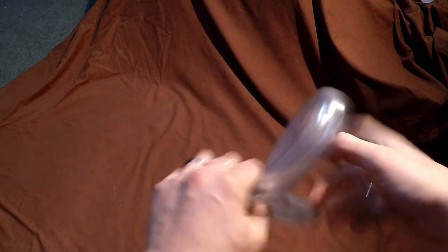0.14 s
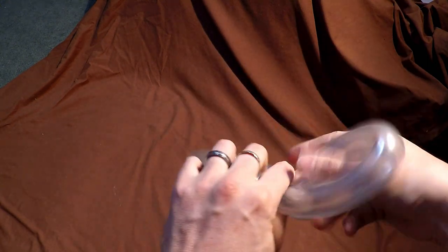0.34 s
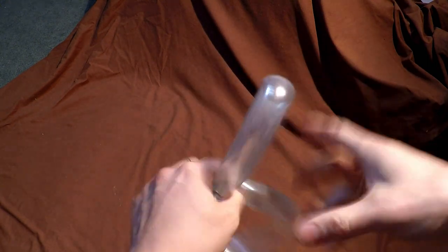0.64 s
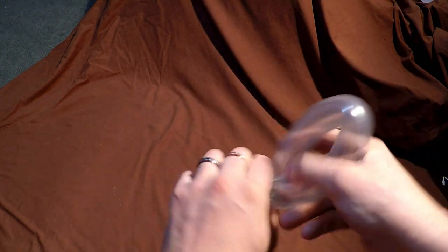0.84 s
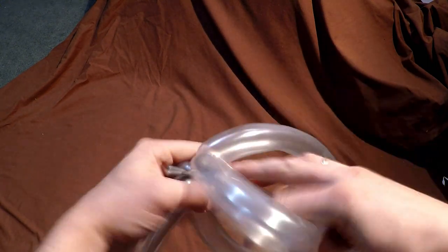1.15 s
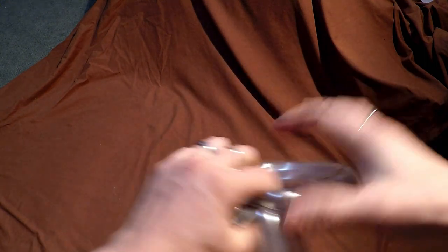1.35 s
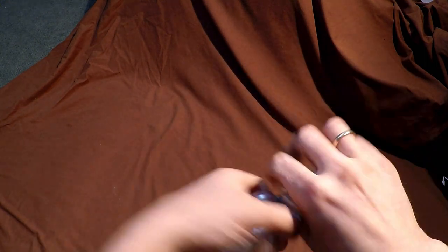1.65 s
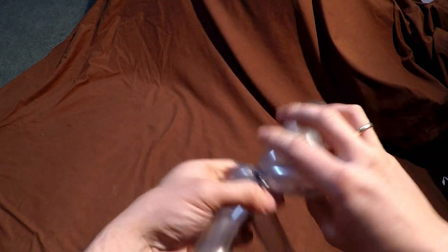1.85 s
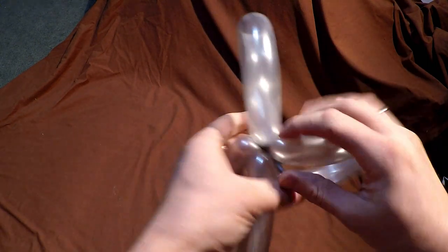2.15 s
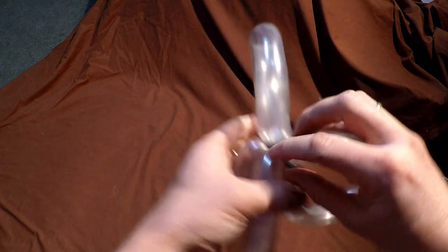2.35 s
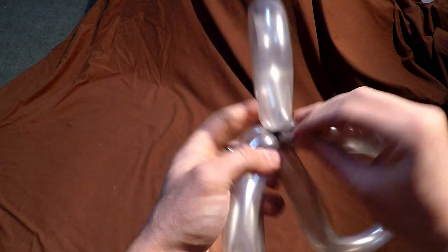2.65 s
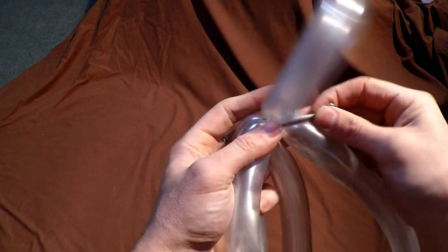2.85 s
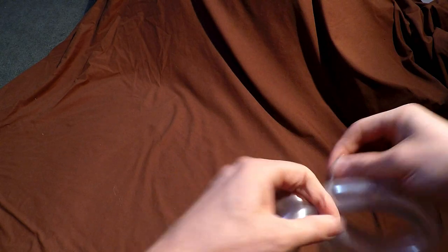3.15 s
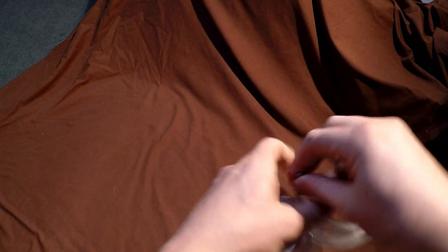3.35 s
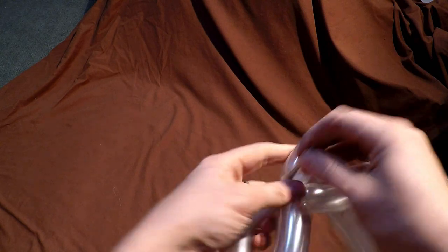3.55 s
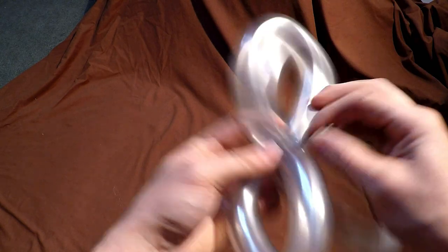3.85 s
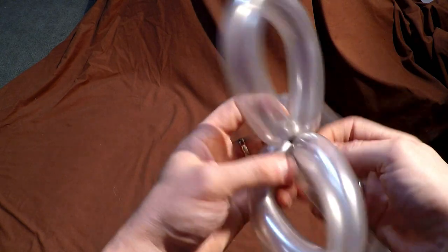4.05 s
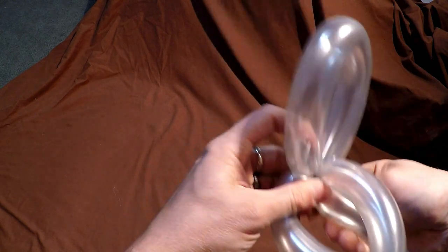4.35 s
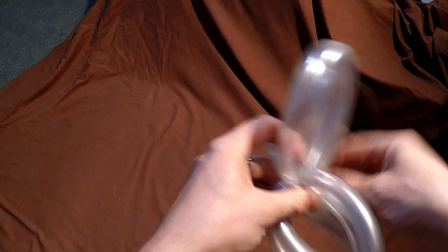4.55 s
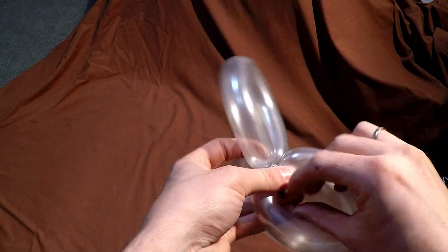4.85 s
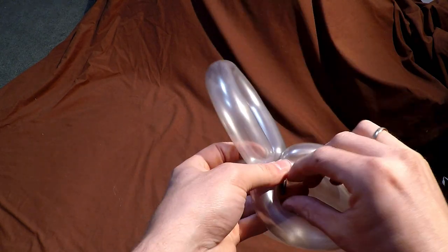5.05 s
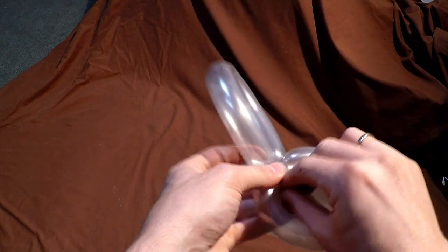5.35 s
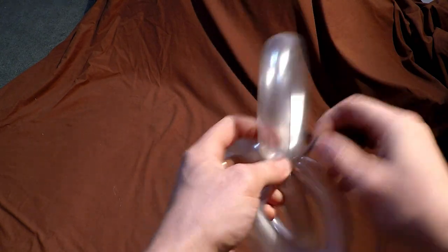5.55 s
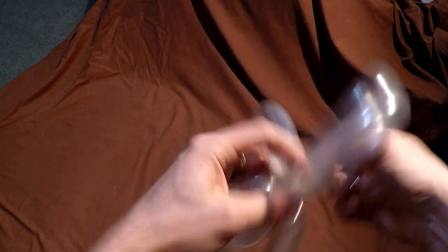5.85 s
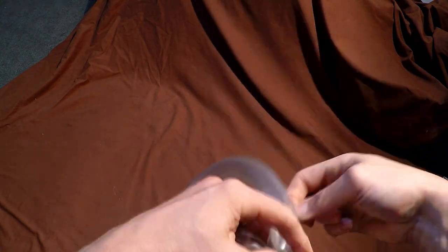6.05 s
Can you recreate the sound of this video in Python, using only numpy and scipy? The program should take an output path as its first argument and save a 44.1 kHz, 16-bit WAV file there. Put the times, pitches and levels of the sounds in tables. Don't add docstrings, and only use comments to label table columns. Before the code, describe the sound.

A long balloon is folded and tightened at close range. Dry skin scuffs over the rubber in uneven strokes, hollow thumps sound as fingers press it, and fine clicks are scattered throughout. Around halfway the rubber sticks and slips in hard cracks and creaks; later a knot ticks rapidly and squeals harshly, followed by short chirps and rubbing. Faint hiss, low air bumps, almost no echo.

```python
import sys
import numpy as np
from scipy import signal
from scipy.fft import rfft, irfft, next_fast_len
from scipy.io import wavfile
from scipy.ndimage import uniform_filter1d, map_coordinates

SR = 44100
rng = np.random.default_rng(int(sys.argv[2]) if len(sys.argv) > 2 else 0)


def master_out(mix):
    frames = np.transpose(np.atleast_2d(mix))
    ceiling = np.clip(frames, -1, 1)
    pcm = np.round(ceiling * 32767).astype(np.int16)
    wavfile.write(sys.argv[1], SR, pcm)


def boost(x):
    u = np.asarray(x, float) / 20
    return 10 ** u


N = 273665
TIME_S = np.arange(N) / SR


def unit(x):
    return x / np.sqrt(np.mean(x ** 2) + 1e-20)


def along(points, hz):
    point_hz, value = np.transpose(points)
    return np.interp(np.log(hz + 1), np.log(point_hz + 1), value)


def over_time(points):
    return np.interp(TIME_S, *np.transpose(points))


def wobble(knots_per_s):
    knots = rng.standard_normal(int(N * knots_per_s / SR) + 4)
    return map_coordinates(knots, [np.arange(N) * knots_per_s / SR])


def coloured(x, spectrum):
    m = next_fast_len(N + 8192) * 2
    points = [(1, -120)] + list(spectrum) + [(SR / 2, -120)]
    gain = boost(along(points, np.fft.rfftfreq(m, 1 / SR)))
    cepstrum = irfft(np.log(gain), m)
    cepstrum[1:m // 2] *= 2
    cepstrum[m // 2 + 1:] = 0
    return unit(irfft(rfft(x, m) * np.exp(rfft(cepstrum)), m)[:N])


def placed(times_s, shapes):
    at = np.round(times_s * SR).astype(int)[:, None] + np.arange(shapes.shape[1])
    return np.bincount(at.ravel(), shapes.ravel(), N + SR)[:N]


def row_peak(x):
    return np.abs(x).max(axis=1, keepdims=True)


def row_norm(x):
    return np.linalg.norm(x, axis=1, keepdims=True)


def onset(t, rise_s):
    return 1 - np.exp(-t / rise_s)


def patchy(depth_db):
    z = signal.stft(rng.standard_normal(N + 512), nperseg=256)[2]
    field = uniform_filter1d(rng.standard_normal(z.shape), 5, 0)
    field = uniform_filter1d(field, 9, 1)
    return unit(signal.istft(z * boost(depth_db * unit(field)), nperseg=256)[1][:N])


def micro_slips(per_second, spread_db, clump_db):
    chance = rng.random((3, N))
    hit = chance[0] < per_second / SR * boost(clump_db * wobble(35))
    size = boost(-spread_db * np.log(chance[2] + 1 / 20))
    return unit(hit * np.sign(chance[1] - .5) * size)


# start_s, end_s, drag_db, fine_surface_db (re
STROKES = [(0, 0.077, -37, -13), (0.146, 0.22, -33, -10), (0.269, 0.42, -36.5, -9.5),
           (0.453, 0.57, -40.5, -12), (0.518, 0.57, -34, -6), (0.672, 0.72, -43.5, -18),
           (0.769, 1.12, -41.5, -9), (0.881, 0.99, -39, -9), (0.934, 1.075, -31, -10),
           (1.119, 1.188, -37.5, -4.5), (1.208, 1.31, -38.5, -18), (1.955, 1.8, -32, -16),
           (1.438, 1.48, -34, -12), (1.488, 1.585, -37, -11.5), (1.56, 1.742, -32, -13),
           (1.785, 1.833, -29, -15.5), (1.88, 2.42, -39, -10.5), (2.085, 2.18, -37.5, -12),
           (2.351, 2.43, -38.5, -14), (2.913, 2.95, -34, -11), (2.432, 2.567, -37, -11),
           (2.613, 2.63, -39, -18), (2.642, 2.69, -30.5, -10.5), (2.745, 3.11, -37, -9.5),
           (3.043, 3.03, -23.5, -8), (3.095, 3.13, -33, -14), (3.182, 3.225, -28, -9.5),
           (3.153, 3.16, -31.5, -13), (3.266, 3.354, -37, -9), (3.398, 3.5, -31.5, -12.5),
           (3.512, 3.96, -33.5, -11), (3.572, 3.618, -26.5, -24),
           (3.736, 3.806, -39, -10), (3.863, 3.894, -26.5, -10), (3.936, 4.098, -25.5, -13),
                (4.157, 4.202, -31.5, -14), (4.213, 4.302, -36, -11), (4.287, 4.32, -35, -14),
                (4.332, 4.424, -27, -9.5), (4.478, 4.567, -34, -8.5), (4.613, 4.727, -37.5, -8.5),
                (4.756, 4.981, -32.5, -12), (5.014, 5.075, -33, -11), (5.129, 5.236, -30.5, -13),
                (5.258, 5.342, -25.5, -12.5), (5.41, 5.488, -37.5, -7), (5.511, 5.549, -28, -14.5),
                (5.594, 5.626, -34.5, -6.5), (5.684, 5.71, -24.5, -11.5), (5.765, 5.827, -40, -7),
                (5.843, 5.866, -28.5, -12.5), (5.92, 6.007, -31, -10.5), (6.005, 6.16, -40.5, -6.5),
                (6.163, 6.21, -27, -16)]
RISE_DB_PER_S, FALL_DB_PER_S = 800, 250
SAG_DB_PER_S = 12
HOLLOW_DB, HOLLOW_FOLLOWS = -18, 0.79


def drag():
    t = np.arange(0, N + 64, 64) / SR
    start, end, db, fine_db = np.transpose(STROKES)[:, :, None]
    stroke_db = db - RISE_DB_PER_S * np.clip(start - t, 0, None)
    stroke_db = stroke_db - FALL_DB_PER_S * np.clip(t - end, 0, None)
    stroke_db = stroke_db - SAG_DB_PER_S * (np.clip(t, start, end) - (start + end) / 2)

    def total(levels_db):
        return np.interp(TIME_S, t, 10 * np.log10((boost(levels_db) ** 2).sum(0)))

    rub_db = total(stroke_db)
    return rub_db, total(stroke_db + fine_db), HOLLOW_DB + HOLLOW_FOLLOWS * rub_db


# start_s, end_s, ring_hz, level_db
GRIPS = [
    (0.252, 0.45, 1530, 9),
    (0.904, 1.162, 1160, 4),
    (1.525, 2.287, 1530, 4.5),
    (3.09, 3.47, 3400, -6),
    (3.793, 4.743, 2360, -2),
    (4.738, 5.2, 844, 4),
    (5.44, 5.595, 750, -7),
    (5.65, 5.982, 1850, 5),
]


def free_wall(force, width_hz):
    out = np.zeros(N)
    for start, end, hz, db in GRIPS:
        held = np.clip(np.minimum(TIME_S - start, end - TIME_S) / 0.024, 0, 1)
        out += held * boost(db) * unit(signal.lfilter(*signal.iirpeak(hz, hz / width_hz, SR), force))
    return out


# freq_hz, density_db (per Hz)
RUB = [(350, -23), (700, -9), (1200, -2), (3600, -4.5), (6500, -15.5), (9500, -29)]
FIZZ = [(2500, -31), (5000, 4), (7500, -4), (11000, -8.5), (16500, -14)]
HOLLOW = [(90, -20), (200, -3), (620, 0.5), (1300, -10.5)]
# time_s, share
GRIT = [(0, .45), (.5, .62), (2.9, .62), (3.8, .5), (3.95, .3), (4.45, .35), (4.75, .55), (5.2, .55),
        (5.5, .25), (6.21, .5)]


def rubbing():
    rub_db, fizz_db, hollow_db = drag()
    grains = micro_slips(450, spread_db=4, clump_db=3) * over_time(GRIT)
    stutter_db = .3 * wobble(16) + 1.1 * wobble(70)
    force = coloured(1.1 * grains + patchy(3), RUB)
    wall = force + boost(-17.5) * free_wall(force, width_hz=260)
    rub = boost(rub_db - 4.0 + stutter_db) * wall
    fizz = boost(fizz_db - 0.65 + 1.6 * stutter_db) * coloured(2.23 * grains + patchy(1.0), FIZZ)
    hollow = boost(hollow_db + 1.2 * stutter_db) * coloured(.8 * grains + patchy(3), HOLLOW)
    return rub + fizz + hollow


# time_s, level_db
SWING = [(0.0, -47), (0.41, -64), (1.5, -55), (1.91, -60), (2.19, -53), (2.64, -50), (3.02, -54),
         (3.37, -51.5), (3.87, -49.5), (4.02, -49), (4.25, -46), (4.61, -50), (5.01, -61), (5.46, -49.5),
         (6.2, -60)]
# freq_hz, density_db (per Hz)
PUSH = [(14, -3), (40, -5), (140, -7), (300, -22.5)]


def pushed_air():
    level_db = over_time(SWING) + 1.5 + 4.5 * wobble(10.0)
    return boost(level_db) * coloured(rng.standard_normal(N), PUSH)


# freq_hz, density_db (per Hz)
HISS = [(20, 18), (16000, -44)]


def quiet_floor():
    return boost(-60.0) * coloured(rng.standard_normal(N), HISS)


# time_s, peak_db, chamber_hz, length_s
TAPS = [(0.146, -23, 380, 0.003), (0.187, -21, 404, 0.0057), (0.2, -30, 93, 0.008),
        (0.53, -17.5, 458, 0.00035), (0.536, -34, 102, 0.018), (0.627, -40, 65.6, 0.042),
        (0.756, -23.5, 413, 0.0031), (1.228, -26, 90.9, 0.011), (1.42, -29, 300, 0.011),
        (1.435, -28.5, 746, 0.0069), (1.458, -22.5, 140, 0.01), (0.205, -35, 337, 0.021),
        (0.779, -40, 345, 0.03), (3.043, -12.5, 170.1, 0.0023), (1.448, -32, 68, 0.031),
        (1.455, -16, 254, 0.0012), (1.625, -32, 84, 0.0058), (1.803, -27, 480, 0.016),
        (2.087, -43, 100, 0.067), (2.435, -46, 90, 0.0064), (2.436, -24, 302, 0.0024),
        (3.047, -14.5, 323, 0.0023), (3.048, -12.5, 100, 0.004), (3.182, -31.5, 375, 0.0073),
        (3.233, -36, 69.5, 0.02), (3.396, -19, 510, 0.0033), (3.61, -30.5, 480, 0.038),
        (3.66, -35, 60, 0.023), (3.893, -29.5, 77, 0.056), (4.393, -17.5, 482, 0.0015),
        (4.68, -28, 99, 0.0085), (5.864, -30.5, 81.4, 0.011), (5.997, -24, 277, 0.0041),
        (6.018, -23, 64.4, 0.006), (6.178, -30, 437, 0.0018)]
# time_s, peak_db, chamber_hz, length_s
MORE_TAPS = [
    (1.045, -36, 160, 0.024),
    (1.443, -32.5, 42.3, 0.065),
    (2.974, -36, 170, 0.038),
    (3.054, -30, 52, 0.018),
    (4.045, -31.5, 67, 0.078),
    (4.174, -37, 66.4, 0.045),
    (4.231, -39, 76.4, .04),
    (4.411, -37, 111, 0.044),
    (4.533, -33.5, 63, 0.026),
    (6.026, -27, 41, 0.03),
]


def taps():
    s, db, hz, length_s = np.transpose(TAPS + MORE_TAPS)[:, :, None]
    t = np.arange(-1500, 4500) / SR
    drift = np.cumsum(rng.standard_normal((len(s), len(t))), 1) * .045
    rise = np.exp(-(t / (.5 * length_s)) ** 2)
    fall = np.exp(-np.abs(t) / (0.19 * length_s))
    swell = np.where(t < 0, rise, fall)
    return placed(s[:, 0] + t[0], boost(db + 3.0) * swell * np.sin(2 * np.pi * hz * t + drift))


TUBE_HZ, TUBE_T60_S = 990, .014


def tube_knock(t, detune_db):
    return np.sin(2 * np.pi * TUBE_HZ * boost(detune_db) * t) * boost(-60 * t / TUBE_T60_S) * onset(t, .001)


# time_s, peak_db,
# ring_hz
CREEP_TICKS = [(4.7627, -23, 3530), (4.7705, -17, 2260), (4.778, -22, 2800), (4.7873, -23, 1920),
               (4.7912, -24, 3120), (4.7976, -23, 1830), (4.8015, -17, 2170), (4.8068, -19, 3850),
               (4.8129, -13, 3700), (4.8242, -10, 3200), (4.8332, -17, 2730), (4.8416, -20, 2650),
               (4.8506, -18, 2710), (4.8577, -21, 4500), (4.8644, -23, 4570), (4.8881, -22, 4800),
               (4.8997, -19, 4090), (4.9034, -21, 3830), (4.9082, -23, 3100), (4.9227, -20, 4590),
               (4.9308, -21, 3450), (4.9412, -19, 4610), (4.9461, -23, 3450), (4.9603, -15, 4570),
               (4.9649, -24, 3660), (4.9781, -15, 4200), (5.002, -16, 4110), (5.0091, -18, 4050),
               (5.0155, -20, 5280), (5.021, -19, 4670), (5.0261, -18, 4180), (5.0302, -17, 3980),
               (5.0346, -20, 3400), (5.0376, -18, 5170), (5.0434, -18, 4160), (5.0546, -16, 5300),
               (5.0615, -23, 2240), (5.0682, -20, 2280), (5.0711, -24, 3510), (5.0965, -25, 2500),
               (5.1068, -26, 4460), (5.1237, -25, 1810), (5.1504, -20, 4440), (5.1598, -14, 4240),
               (5.1983, -19, 3120), (5.2099, -21, 2560), (5.2164, -21, 2090), (5.244, -17, 4650)]
SCATTERED_TICKS = [(0.2586, -30, 950), (0.2726, -23, 1460), (0.2842, -29, 1400), (0.3012, -27, 1400),
                   (0.3115, -30, 1460), (0.32, -26, 1400), (0.3298, -26, 1400), (0.3573, -22, 1460),
                   (0.3681, -29, 1660), (0.3812, -24, 1360), (0.3946, -27, 1420), (0.4093, -27, 1380),
                   (0.4237, -27, 1340), (0.8941, -24, 4630), (0.9317, -20, 2840), (0.9395, -21, 1660),
                   (1.118, -25, 5880), (1.169, -23, 5620), (1.176, -23, 1810), (1.2393, -25, 4440),
                   (1.3484, -32, 4070), (1.6227, -24, 1400), (1.6539, -21, 4520), (1.6688, -24, 2200),
                   (1.6755, -19, 2500), (1.7027, -20, 1120), (1.7223, -22, 4330), (1.7496, -25, 3660),
                   (1.9139, -20, 4050), (2.1451, -23, 1680), (2.2499, -25, 1100), (2.3027, -27, 1100),
                   (2.3606, -26, 2240), (2.4401, -21, 3640), (2.4683, -22, 1570), (2.5119, -21, 1120),
                   (2.5221, -27, 3230), (2.5349, -23, 3320), (2.5424, -25, 2390), (2.5512, -24, 1720),
                   (2.57, -25, 5600), (2.6147, -23, 4870), (2.6469, -18, 3600), (2.6617, -18, 3270),
                   (2.6799, -21, 4840), (2.6891, -19, 4180), (2.7673, -22, 3530), (2.8069, -21, 3750),
                   (2.8139, -22, 3750), (2.8811, -21, 4290), (3.0165, -22, 1720),
                   (3.2053, -21, 4370), (3.334, -24, 3550), (3.4786, -25, 3420), (3.5019, -22, 1830),
              (3.7526, -21, 2500), (3.7692, -20, 1640), (3.7811, -18, 4260), (3.7987, -21, 4180),
              (3.8091, -23, 4330), (3.831, -20, 2350), (3.8376, -21, 2430), (4.0144, -15, 2280),
              (4.1246, -22, 1460), (4.1302, -23, 2020), (4.1576, -20, 5430), (4.1783, -20, 3320),
              (4.1842, -21, 4070), (4.2173, -20, 4720), (4.2999, -19, 4290), (4.3132, -20, 4240),
              (4.4907, -26, 4440), (4.5146, -23, 3530), (4.5935, -23, 2580), (4.619, -24, 2540),
              (4.6594, -24, 3470), (4.6723, -21, 4590), (5.354, -19, 2050), (5.3961, -23, 4500),
              (5.4288, -24, 4540), (5.4487, -24, 1830), (5.4827, -23, 2610), (5.5966, -21, 4630),
              (5.6684, -25, 1680), (5.7392, -22, 2930), (5.8628, -22, 2000), (5.8729, -19, 1960),
              (6.0884, -24, 5430), (6.1684, -19, 3570)]
TICK_CYCLES = 9.5


def ticks():
    s, db, hz = np.transpose(CREEP_TICKS + SCATTERED_TICKS)[:, :, None]
    t = np.arange(900) / SR
    luck = rng.standard_normal((len(s), 4 + len(t)))
    overtone_hz = 1.4 * boost(.6 * luck[:, :1]) * hz
    ring = np.sin(2 * np.pi * hz * t) + .45 * np.sin(2 * np.pi * overtone_hz * t)
    ring = ring * boost(-60 * t * hz / TICK_CYCLES) * onset(t, .00018)
    noise = uniform_filter1d(luck[:, 4:], size=3, axis=1)
    crack = .22 * np.sqrt(hz / 4000) * noise * boost(-60 * t / .004)
    shape = np.sign(luck[:, 3:4]) * ring + crack
    knock = boost(-8.5 + 2 * luck[:, 2:3]) * (hz > 2000) * tube_knock(t, .7 * luck[:, 1:2])
    return placed(s[:, 0] - .0002, boost(db + .8) * (shape / row_peak(shape) + knock))


# time_s, peak_db, ring_hz, crack_db (above 6 kHz)
SNAPS = [(.7532, -30, 900, -14), (1.0149, -17, 3830, -14), (1.4122, -28, 730, -14),
         (2.1554, -21, 3600, -11), (2.4204, -11, 3600, -21), (2.6408, -17, 1100, -6),
         (2.8259, -19, 2070, -9), (3.0481, -8, 3270, -21), (3.0907, -9, 1700, -18),
         (3.1518, -13, 1750, -23), (3.1796, -1, 2070, -7), (3.3171, -17, 3450, -8),
         (3.4012, -19, 1030, -20), (3.5517, -12, 1350, -19), (3.591, -4, 1940, -20),
         (3.7328, -15, 2410, -17), (3.8471, -15, 3320, -10), (3.8698, -13, 2280, -14),
         (3.9127, -14, 3270, -17), (4.1921, -15, 2070, -9), (4.331, -12, 2850, -14),
         (4.3539, -7, 2080, -10), (4.3755, -5, 2070, -11), (4.4321, -10, 2300, -11),
         (5.1723, -8, 3700, -14), (5.1949, -6, 2900, -21), (5.6036, -19, 1770, -15),
         (5.6733, -17, 1640, -19)]
# start_s, slips, gap_ms, peak_db, ring_hz
CREAKS = [(1.4457, 2, 8.2, -19, 1200), (2.4324, 2, 1.8, -12, 3400), (2.475, 2, 6.3, -20, 1400),
          (2.697, 2, 6.5, -17, 1500), (3.182, 1, 0, -16, 1160), (3.3512, 2, 2.7, -18, 2900),
          (3.392, 3, 1.7, -7, 1200), (3.5713, 3, 2.4, -9, 3500), (3.582, 3, 2.35, -8, 4300),
          (3.5945, 5, 2, -8, 2950), (3.6073, 2, 1.7, -6, 3900), (3.6133, 2, 2.2, -11, 1350),
          (3.6768, 2, 2.2, -16, 5200), (3.7429, 2, 5.4, -16, 1900),
          (3.9303, 2, 13.9, -8, 2250), (3.9376, 2, 16.9, -14, 2250), (3.9705, 2, 7.6, -11, 2400),
               (3.9854, 2, 6.2, -9, 2450), (4.0263, 2, 7.5, -10, 2330), (4.0396, 5, 7.9, -10, 2370),
               (4.0771, 3, 3.3, -11, 2100), (4.1453, 1, 0, -19, 2070), (4.1622, 4, 5.3, -17, 2200),
               (4.3909, 3, 9.5, -10, 2200), (4.5252, 3, 2.5, -10, 1150), (4.0104, 2, 8.3, -17, 2350),
               (5.6934, 2, 2.1, -8, 2850), (5.7045, 3, 2.4, -7, 2980), (5.7166, 2, 1.7, -6, 2900),
               (5.85, 2, 4.6, -16, 1900), (5.9488, 3, 9.5, -14, 3400), (6.1885, 2, 3.9, -15, 2580)]
# start_s, slips, gap_ms, peak_db, ring_hz
SQUEAL = [
    (5.2566, 4, 8.73, 0, 1810),
    (5.2861, 1, 0, -1, 1810),
    (5.2924, 5, 2.95, -2, 1780),
    (5.3111, 3, 2.75, -2, 1780),
    (5.321, 1, 0, -1, 1740),
    (5.3404, 1, 0, -1, 1810),
]
PACE_SCATTER, SIZE_SCATTER_DB, PITCH_SCATTER = .04, 1.2, .04
SQUEAL_STEADY = .35
CREAK_CRACK_DB, CRACK_SCATTER_DB = -15.5, 1.5
STICK_DB = 1.8
RING_DB, RING_LOSS, RING_SCATTER_DB = -10, .2, 1.2
HIGH_RING_DB, LOW_RING_DB = -2.5, 3


def releases():
    runs = [(row, 1) for row in CREAKS] + [(row, SQUEAL_STEADY) for row in SQUEAL]
    train = []
    for (start_s, count, gap_ms, db, hz), loose in runs:
        stuck = np.log2(np.clip(gap_ms, 2, 8) / 4) * (count > 1) * (loose == 1)
        for k in range(count):
            slack_s = loose * (k > 0) * gap_ms / 1000
            train.append((start_s, k * gap_ms / 1000, db, hz, slack_s, loose, stuck))
    s, after_s, db, hz, slack_s, loose, stuck = np.transpose(train)
    luck = rng.standard_normal((4, len(s)))
    creaks = [s + after_s + PACE_SCATTER * slack_s * luck[0],
              db + SIZE_SCATTER_DB * loose * (after_s > 0) * luck[1],
              hz * (1 + PITCH_SCATTER * loose * luck[2]),
              CREAK_CRACK_DB + 2 * STICK_DB * stuck + CRACK_SCATTER_DB * luck[3]]
    s, db, hz, crack_db = np.hstack([np.transpose(SNAPS), creaks])
    stuck = np.pad(stuck, (len(SNAPS), 0))
    loose = np.pad(loose, (len(SNAPS), 0), constant_values=1)
    ring_db = RING_DB - RING_LOSS * db + HIGH_RING_DB * (hz > 3000) + LOW_RING_DB * (hz < 1300)
    ring_db = ring_db + STICK_DB * stuck + RING_SCATTER_DB * loose * rng.standard_normal(len(s))
    return np.array([s, db, hz, ring_db, crack_db])


def slips():
    s, db, hz, ring_db, crack_db = releases()[:, :, None]
    t = np.arange(1024) / SR
    luck = rng.standard_normal((len(s), 3 + 2 * len(t)))
    taut = db > -4.5

    phase = t * 2 * np.pi * np.where(taut, 3200, 3250) * boost(.4 * luck[:, :1])
    snap = -np.sin(phase) * np.exp(-(phase - 4) ** 2 / 6)

    mode_below = (hz > 2800) | (hz > 2000) & (luck[:, 2:3] < -1)
    other_hz = np.where(mode_below, hz / 1.9, hz * 2.05) * boost(.35 * luck[:, 1:2])
    life_s = .0075 * boost(.9 * (ring_db + 9))
    fade = boost(-60 * t / life_s)
    modes = np.sin(2 * np.pi * hz * t) + np.sin(2 * np.pi * other_hz * t) * fade
    ring = modes * boost(ring_db + 6) * fade * onset(t, .0002)

    direct = boost(-.8 * ring_db - 7 + 4 * taut) * snap + ring
    direct = direct + boost(ring_db - 7) * (hz > 1400) * tube_knock(t, .5 * luck[:, 1:2])
    back = np.pad(direct, ((0, 0), (54, 0)))[:, :len(t)]
    back = back * boost(-12 + 1.5 * luck[:, 2:3])

    slow = uniform_filter1d(luck[:, -len(t):], size=11, axis=1)
    rattle = slow * np.sin(2 * np.pi * 1.2 * hz * t) * onset(t, .0005)
    rattle = rattle * boost(ring_db + 2 - 5 * taut - 60 * t / .012)

    f = np.fft.rfftfreq(len(t), 1 / SR)
    low = 1j * f / np.where(taut, .9 * hz, 620)
    high = 1j * f / 7200
    highpass = (low ** 2 / (1 + 1.05 * low + low ** 2)) ** 3
    lowpass = 1 / (1 + high + high ** 2)
    body = irfft(rfft(direct + back + rattle) * highpass * lowpass)

    fine = uniform_filter1d(luck[:, 3:3 + len(t)], size=2, axis=1)
    fine = fine * boost(-60 * t / .005) * onset(t, .0002)
    crack = irfft(rfft(fine) * high ** 2 * lowpass)
    crack = crack * boost(crack_db - 1.5 - 3.4 * taut) * row_norm(body) / row_norm(crack)
    shape = body + crack
    return placed(s[:, 0] - t[11], boost(db) * shape / row_peak(shape))


# start_s, length_s, first_hz, last_hz, level_db
SQUEAKS = [
    (3.107, .036, 1705, 1660, -41.5),
    (5.458, 0.025, 1060, 1023, -36),
    (5.517, 0.0436, 1140, 707, -33.5),
    (5.548, 0.024, 1705, 1570, -38.5),
]


def squeaks():
    s, length_s, first_hz, last_hz, db = np.transpose(SQUEAKS)[:, :, None]
    t = np.arange(2600) / SR
    luck = uniform_filter1d(rng.standard_normal((5, len(s), len(t))), size=90, axis=2) * 9
    pitch_hz = last_hz + (first_hz - last_hz) * np.exp(-t / .01)
    phase = 2 * np.pi * np.cumsum(pitch_hz, 1) / SR
    tone = 0
    for k in range(5):
        level = boost(-3.5 * k + (2 + k) * luck[k])
        tone = tone + level * np.sin((k + 1) * phase + .35 * k * luck[k - 1])
    gate = np.clip(np.minimum(t, length_s - t) / 0.0051, 0, 1)
    return placed(s[:, 0], boost(db) * tone * gate)


# freq_hz, t60_s
ROOM = [(200, 0.2), (10000, 0.0047)]


def room(x):
    hz, t, z = signal.stft(rng.standard_normal(SR // 3), SR, nperseg=256)
    tail = signal.istft(z * boost(-60 * t / along(ROOM, hz)[:, None]), SR, nperseg=256)[1]
    return signal.fftconvolve(np.pad(x, (180, 0)), tail / np.linalg.norm(tail))[:N]


def scene():
    smooth = rubbing() + pushed_air() + quiet_floor()
    sharp = taps() + ticks() + slips() + squeaks()
    return (sharp + boost(-19) * room(sharp) + smooth)[None]


def low_pass(x):
    return signal.sosfilt(signal.butter(12, 16480, fs=SR, output="sos"), x)


# freq_hz, gain_db
MICROPHONE = [(20, -9), (40, 0), (15200, 0), (15500, -24), (17000, -36)]


def record(dry):
    limited = dry / (1 + np.abs(dry / 1.05) ** 8) ** (1 / 8)
    gain = boost(along(MICROPHONE, np.fft.rfftfreq(N, 1 / SR)))
    dulled = irfft(rfft(limited) * gain, N)
    return low_pass(dulled)


dry = scene()
out = record(dry)
master_out(out)
```